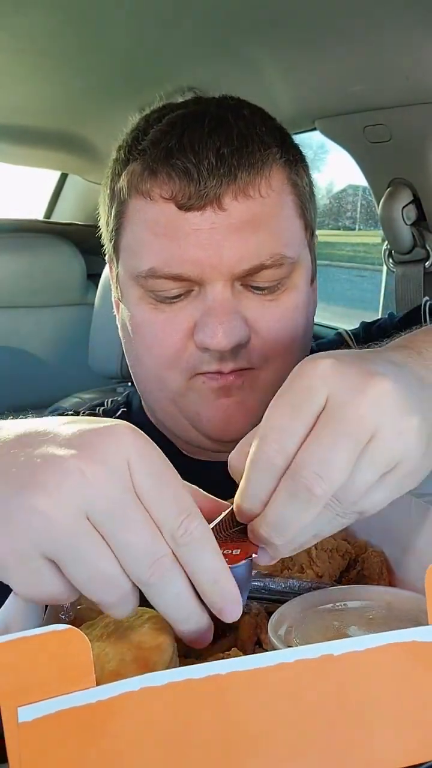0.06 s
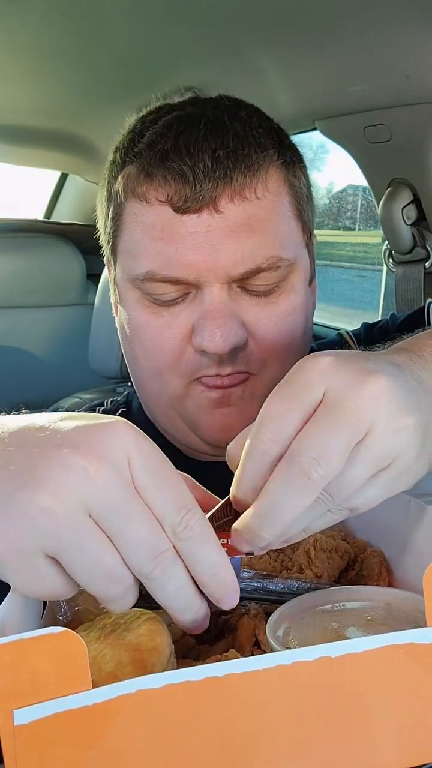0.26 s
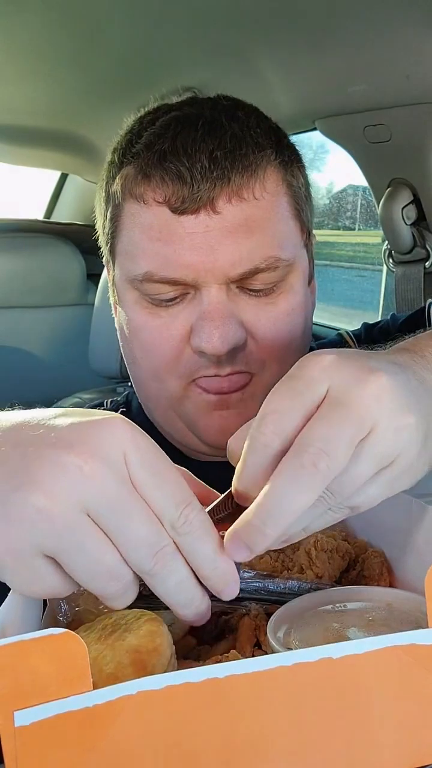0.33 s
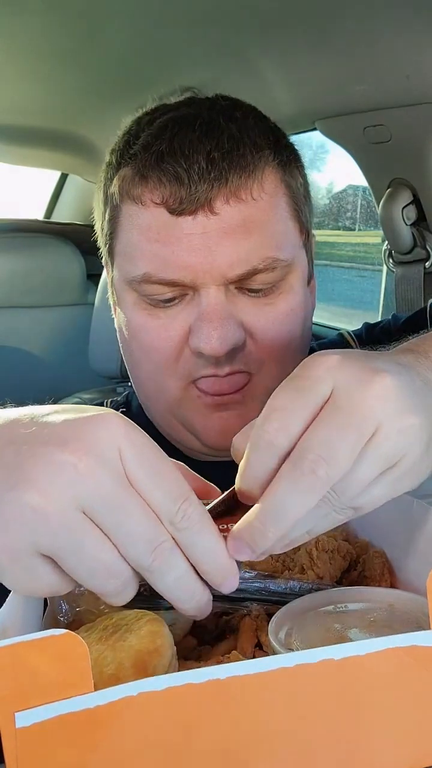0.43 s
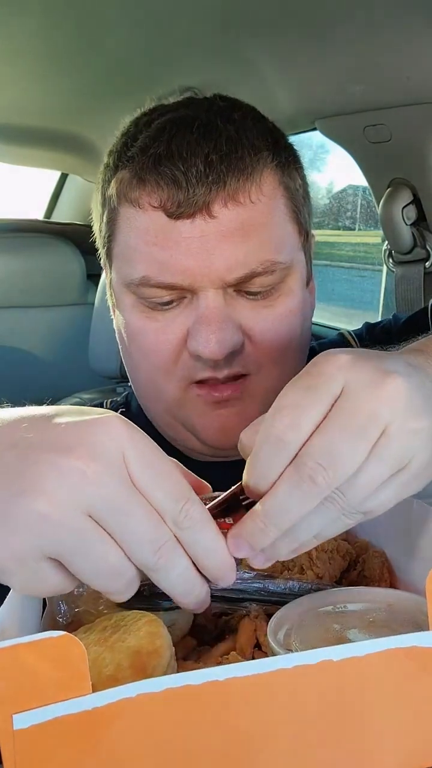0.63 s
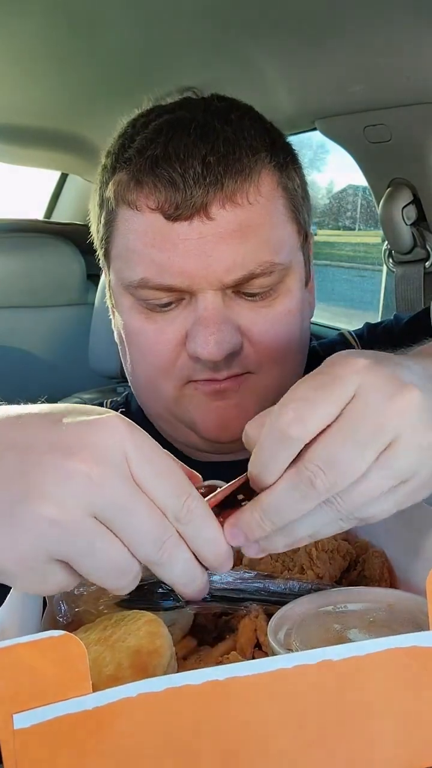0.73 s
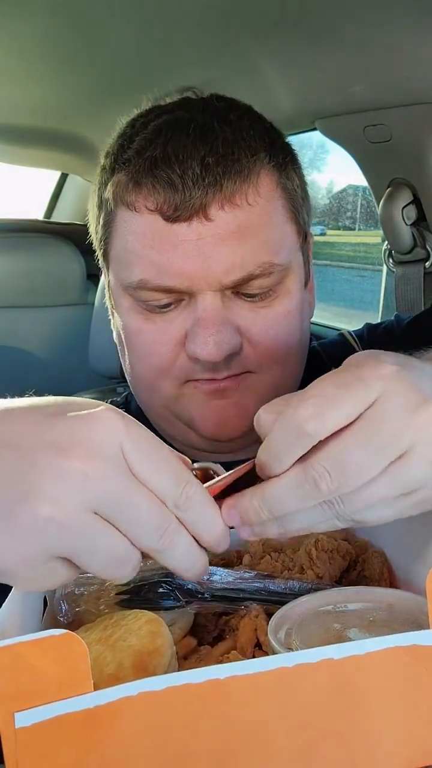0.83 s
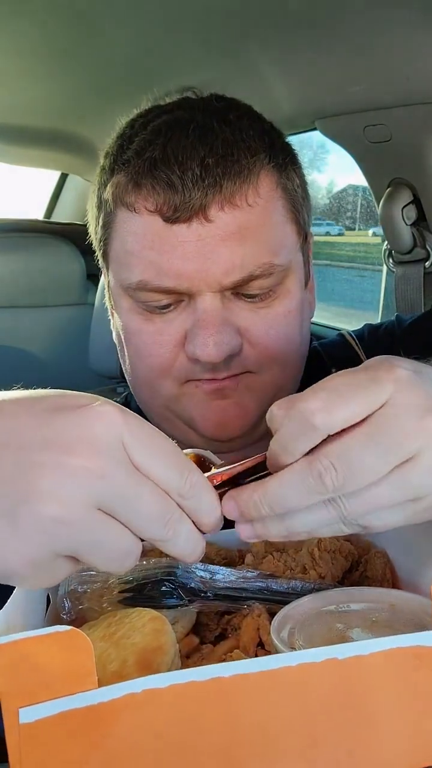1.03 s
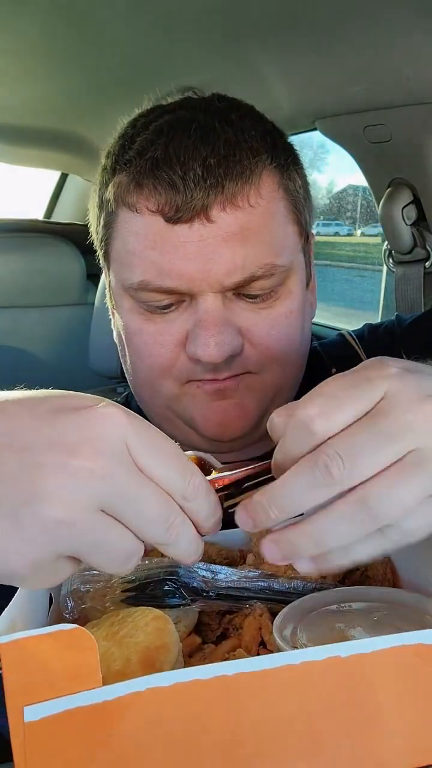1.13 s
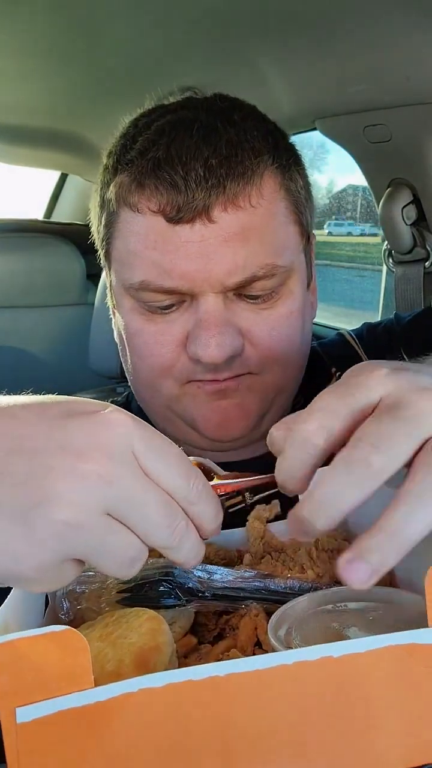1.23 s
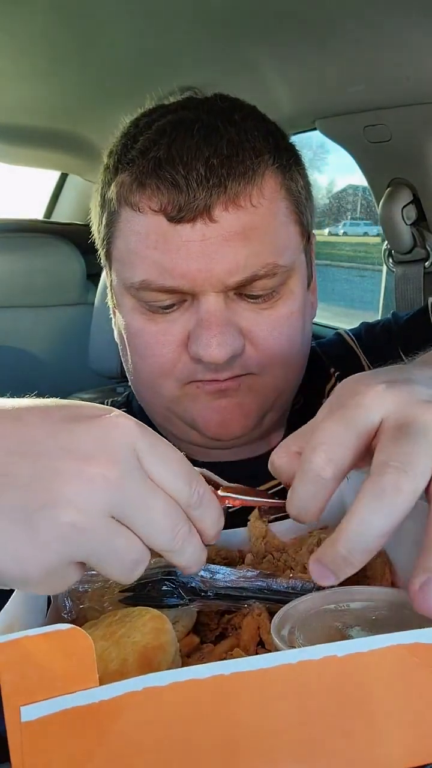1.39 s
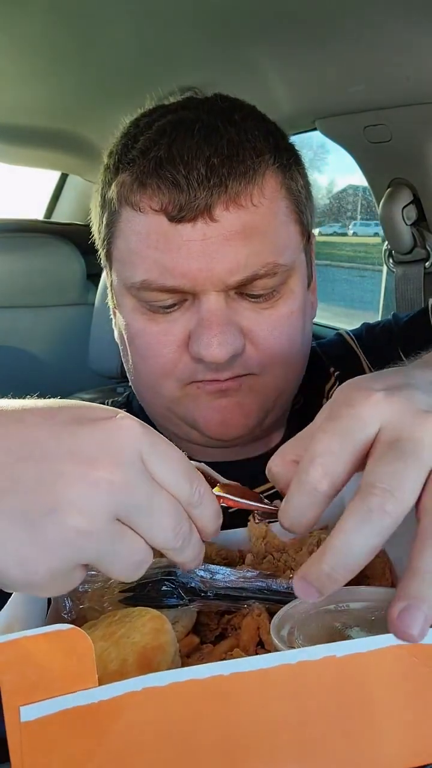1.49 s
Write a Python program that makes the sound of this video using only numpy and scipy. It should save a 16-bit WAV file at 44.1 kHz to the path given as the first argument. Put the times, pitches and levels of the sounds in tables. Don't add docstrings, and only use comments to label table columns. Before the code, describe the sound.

A small plastic sauce packet is pinched, crinkled and torn by fingers very close to a phone microphone, crisp snaps growing densest mid-way then thinning, over a faint engine idle in a padded car cabin.

```python
import sys
import numpy as np
from scipy import signal
from scipy.io import wavfile
from scipy.ndimage import uniform_filter1d

SR = 44100
rng = np.random.default_rng(int(sys.argv[2]) if len(sys.argv) > 2 else 0)


def to_wav(sig):
    pcm = np.clip(np.atleast_2d(sig), -1, 1) * 32767
    pcm = np.round(pcm).astype(np.int16)
    wavfile.write(sys.argv[1], SR, pcm.T)


def nominal_scale(level):
    x = np.asarray(level, float) / 20
    return 10 ** x


N = 68355

# pitch_hz, level_db [dB per Hz]
WASH_SPECTRUM = [(25, -5), (75, -3), (170, -14.5), (320, -20), (700, -18), (2000, -22), (5000, -33),
                 (13000, -62)]
# order [multiple of idle rate], level_db
IDLE_ORDERS = [(1, -61.5), (2, -59.5), (3, -68.5), (4, -74)]
# pitch_hz, width_hz, level_db
CABIN_BOOM = [
    (55.7, 9.9, -65),
    (127.5, 90, -62),
    (256, 57, -68.5),
]
# nearest_s, span_s, pitch_hz, width_hz, level_db
PASSING_VEHICLE = (.8, .17, 450, 140, -65)
# time_s, level_db
FINGER_RUB = [(0, -70.5), (.12, -63), (.35, -59), (.6, -58), (.75, -74), (1.1, -65), (1.3, -73),
              (1.55, -65)]
# pitch_hz, width_hz, level_db
FILM_MODES = [(1200, 100, -37), (2245, 83, 6), (3410, 210, 7), (4140, 403, 5.5), (5090, 510, 1),
              (11460, 930, -5)]
# start_s, length_s, level_db, dullness_db
SLIP_RUNS = [(0.052, 0.013, -63, 27), (0.1, 0.095, -72, -17), (0.18, 0.03, -44.5, -10),
             (0.204, 0.038, -42.5, 0), (0.245, 0.042, -39, -24), (0.314, 0.075, -54.5, -13),
             (0.4, 0.037, -48.5, 6), (0.477, 0.032, -33, 5.5), (0.499, 0.11, -55.5, -2),
             (0.617, 0.04, -29, -13), (.648, .018, -32, -5), (0.657, 0.033, -38, -26),
             (0.7021, 0.012, -34, 13.5), (0.717, 0.087, -50.5, 15), (0.791, 0.021, -34.5, 6.5),
             (0.834, 0.076, -48.5, 10), (0.854, 0.015, -52.5, 29.5), (0.888, 0.1, -57, 11.5),
             (0.973, 0.03, -49.5, 13.5), (1.034, 0.06, -51.5, 11), (1.096, 0.059, -55.5, -2),
             (1.221, .04, -48.5, -7), (1.262, 0.046, -45.5, -17), (1.293, 0.038, -52, -11),
             (1.368, 0.082, -54, 4), (1.441, 0.074, -63.5, -7), (1.496, 0.019, -58, 3)]
# delay_s, level_db
BOUNCES = [
    (.0016, -5),
    (.0029, -10),
]
PINCH_TIMES = [.109, .1312, .1875, .2112, .2152, .2158, .2458, .2589, .2716, .3625, .4045, .4526, .4556,
               .4785, .5228, .5366, .5394]
TEAR_TIMES = [.6077, .6099, .6258, .6278, .6318, .6685, .6745, .7022, .7582, .7594, .7646, .8355, .8525,
              .859]
AFTER_TIMES = [.9838, 1.0316, 1.0525, 1.1515, 1.1588, 1.175, 1.1936, 1.1962, 1.2434, 1.3071, 1.499, 1.5245]
# peak_db, film_note_hz, note_db, body_db
PINCH_POPS = [(-40.5, 5000, -9, -9), (-38.5, 2310, 22, 3), (-36, 5100, -5, 3), (-32, 5300, -2, 3),
              (-10.5, 4300, 8, -6), (-25.5, 2140, 18.5, -12), (-29, 5100, 4, 4), (-11, 5600, -7, -25),
              (-14, 5500, -1.5, -12), (-32.5, 4770, 18, 2.5), (-35.5, 5300, 9, -1),
              (-10.5, 3640, 1.5, -8.5), (-15, 4200, 0, -1), (-25.5, 1200, 17, 9.5), (-30.5, 3500, 12.5, -3),
              (-30, 5700, -4, -3.5), (-36, 5260, -4, -13)]
TEAR_POPS = [(-18.5, 5500, -18, -9), (-2, 6100, -4, -19), (-11.5, 790, -1, -2), (-8.5, 5900, -21, -24),
             (-8.5, 3360, 0, -5.5), (-13, 4000, 1, 0), (-19.5, 5600, -5, 6.5), (-30, 2400, -6, 14.5),
             (-17, 1780, 5, 5.5), (-7.5, 3440, 0, -12), (-25.5, 4080, 21, 10), (-19, 3300, -12, -14),
             (-25, 3750, -8, -10), (-53, 1200, 15, 14)]
AFTER_POPS = [(-35, 5300, 7.5, -2.5), (-43.5, 2500, -2, 3), (-45, 3600, 13, 4), (-16, 5000, -17, -14),
              (-20, 4800, -1, -6), (-34, 4200, 12, 3), (-21, 4930, 9.5, -7), (-29, 5000, -8, -22),
              (-23, 2700, -1.5, -4), (-24.5, 4360, -7, -5.5), (-37.5, 2200, 8, -3), (-32, 5100, 19, 12)]
# pitch_hz, width_hz, level_db
MIC_PORT = [(7283, 1398, 22), (7788, 1180, 21)]

CABIN_DB, CABIN_T60_S = -26.5, 0.11


def evened(x):
    return x / np.sqrt(np.mean(x ** 2) + 1e-20)


def add(mix, start_s, sound):
    part = mix[max(round(start_s * SR), 0):][:len(sound)]
    part += sound[:len(part)]


def resonate(x, hz, width_hz):
    r = np.exp(-np.pi * width_hz / SR)
    return 2 * signal.lfilter([1 - r], [1, -r * np.exp(2j * np.pi * hz / SR)], x).real


def resonate_twice(x, hz, width_hz):
    return resonate(resonate(x, hz, width_hz), hz, width_hz)


def highpass(x, edge_hz):
    return signal.sosfilt(signal.butter(2, edge_hz, "high", fs=SR, output="sos"), x)


def slow_drift(per_s):
    t = np.arange(N) / SR
    drift = np.zeros(N)
    for f in np.geomspace(.1, 1, num=16):
        drift += np.sin(2 * np.pi * (f * per_s * t + rng.random())) / np.sqrt(f)
    return evened(drift)


def air_wash():
    wash_db, patch_db = -60, 3.5
    frames, hz = N // 512 + 5, np.fft.rfftfreq(2048, 1 / SR)
    real, imaginary, patches = rng.standard_normal((frames, 1025, 3)).T
    patches = uniform_filter1d(patches, size=16, axis=0)
    patches = evened(uniform_filter1d(patches, size=6, axis=1))
    f, db = np.transpose(WASH_SPECTRUM)
    tilt_db = np.interp(np.log(hz + 1), np.log(f), db, left=-40)[:, None]
    spectrum = (real + 1j * imaginary) * nominal_scale(tilt_db + patch_db * patches)
    noise = signal.istft(spectrum, nperseg=2048, noverlap=1536)[1][:N]
    return nominal_scale(wash_db) * evened(noise)


def drone(hz, width_hz, db):
    return nominal_scale(db) * evened(resonate_twice(rng.standard_normal(N), hz, width_hz))


def passing_vehicle():
    nearest_s, span_s, hz, width_hz, db = PASSING_VEHICLE
    t = np.arange(N) / SR
    return np.exp(-((t - nearest_s) / span_s) ** 2) * drone(hz, width_hz, db)


def engine_hum():
    idle_hz, waver, waver_db = 55.2, .015, 3.5
    turns = np.cumsum(idle_hz * (1 + waver * slow_drift(4.1))) / SR
    hum = np.zeros(N)
    for order, db in IDLE_ORDERS:
        strength = np.sqrt(2) * nominal_scale(db + waver_db * slow_drift(8.07))
        hum += strength * np.sin(2 * np.pi * (order * turns + rng.random()))
    for hz, width_hz, db in CABIN_BOOM:
        hum += drone(hz, width_hz, db)
    return hum


def finger_rub():
    s, db = np.transpose(FINGER_RUB)
    hiss = highpass(rng.standard_normal(N), 2100)
    return nominal_scale(np.interp(np.arange(N) / SR, s, db) + 3.2 * slow_drift(30.1)) * hiss


def packet_film(tick, body):
    film_db, low_edge_hz = 8, 1740
    rung = tick + sum(nominal_scale(db + film_db) * resonate(body, hz, width_hz) for hz, width_hz, db in FILM_MODES)
    return highpass(rung, low_edge_hz)


def slip_runs():
    slips_per_s, spread_db = 3000, 3.5
    run_db, dull_db, wet_db = -17, -8, -4
    peak_at = .35
    dull_hz, dull_width_hz = 1890, 1370
    t = np.arange(N) / SR
    happens = rng.random(N) < slips_per_s / SR
    sign = rng.choice([-1., 1.], N)
    size_db = spread_db * np.minimum(rng.exponential(1, N), 3)
    slips = evened(happens * sign * nominal_scale(size_db)) * nominal_scale(run_db)
    bright, dull = np.zeros(N), np.zeros(N)
    for start_s, length_s, db, dullness_db in SLIP_RUNS:
        u = np.clip((t - start_s) / length_s, 0, 1)
        swell = nominal_scale(db) * np.sin(np.pi * u ** (np.log(.5) / np.log(peak_at))) ** 2
        bright += swell
        dull += swell * nominal_scale(dullness_db + dull_db)
    near = packet_film(slips * bright, slips * bright)
    near = near + 4 * resonate_twice(slips * dull, dull_hz, dull_width_hz)
    cabin = rng.standard_normal(6000) * nominal_scale(CABIN_DB + wet_db - 60 * t[:6000] / CABIN_T60_S)
    return near + signal.oaconvolve(near, cabin)[:N]


def crease_snaps():
    snap_db, note_gain_db = -10.5, 10.5
    crack_t60_s, crack_rise_s, crack_grit = 0.0052, 0.00041, .3
    lead_in_s, lead_in_db = .005, -34
    note_sharpness, note_wet = 6, .7
    ticks, body, notes = np.zeros(N), np.zeros(N), np.zeros(N)
    t = np.arange(6000) / SR
    times = PINCH_TIMES + TEAR_TIMES + AFTER_TIMES
    pops = PINCH_POPS + TEAR_POPS + AFTER_POPS
    chance = rng.standard_normal((len(pops), 2, len(t)))
    lead = t[t < lead_in_s] / lead_in_s
    crack_shape = crack_grit * nominal_scale(-60 * t / crack_t60_s) * np.minimum(t / crack_rise_s, 1)
    cabin_shape = nominal_scale(CABIN_DB - 60 * t / CABIN_T60_S) * np.minimum(t / 0.0047, 1)
    for s, (db, hz, note_db, body_db), (grit, tail) in zip(times, pops, chance):
        crack = crack_shape * grit + (t == 0)
        near, cabin = crack.copy(), cabin_shape * tail
        for k, (delay_s, bounce_db) in enumerate(BOUNCES):
            add(near, delay_s * (1 + 0.17 * np.tanh(tail[k])), nominal_scale(bounce_db) * crack)
        size = nominal_scale(db + snap_db)
        add(ticks, s - lead_in_s, size * nominal_scale(lead_in_db) * lead ** 2 * grit[-len(lead):])
        add(ticks, s, size * (near + cabin))
        add(body, s, size * nominal_scale(body_db) * (near + cabin))
        note = resonate_twice(near + note_wet * cabin, hz, 200 + hz / note_sharpness)
        add(notes, s, size * nominal_scale(note_gain_db + note_db) * note)
    return packet_film(ticks, body) + notes


def scene():
    packet = crease_snaps() + slip_runs()
    return (packet + air_wash() + engine_hum() + passing_vehicle())[None]


def roll_off(x):
    return signal.sosfilt(signal.butter(12, 14060, fs=SR, output="sos"), x)


def record(dry):
    port = dry + sum(nominal_scale(db) * resonate_twice(dry, hz, width_hz) for hz, width_hz, db in MIC_PORT)
    band_limit = signal.firwin(151, 13070, window=("kaiser", 6), fs=SR)[None]
    mix = signal.oaconvolve(port + finger_rub(), band_limit, "same")
    return roll_off(mix)


dry = scene()
out = record(dry)
to_wav(out)
```